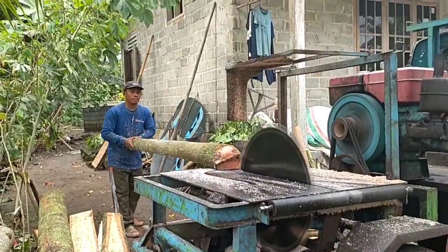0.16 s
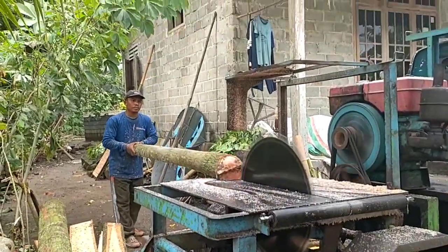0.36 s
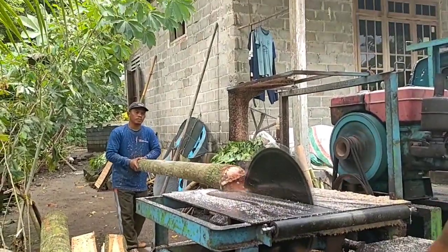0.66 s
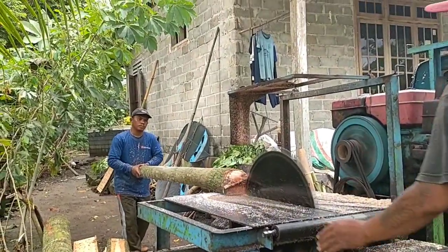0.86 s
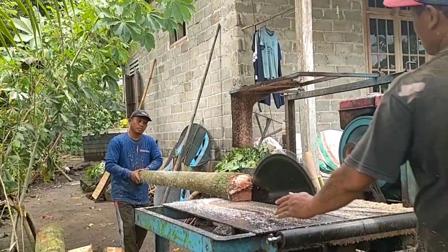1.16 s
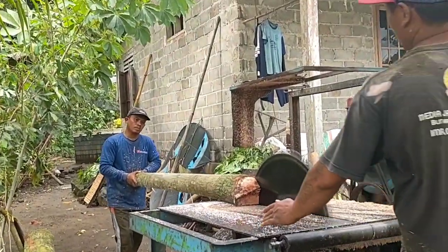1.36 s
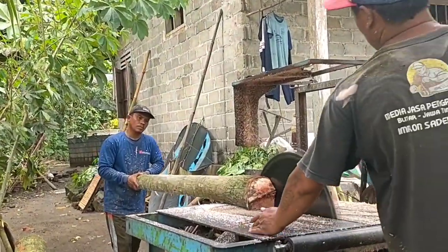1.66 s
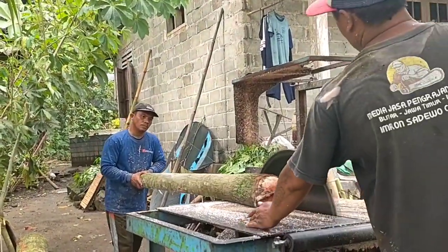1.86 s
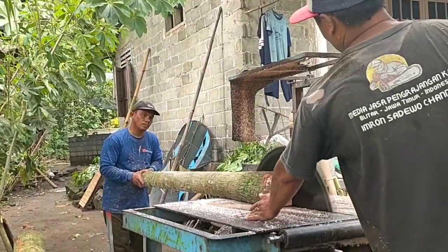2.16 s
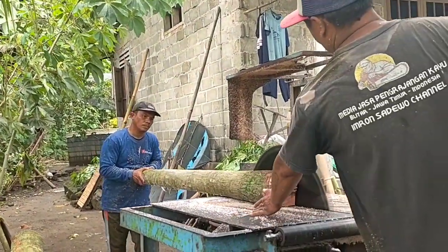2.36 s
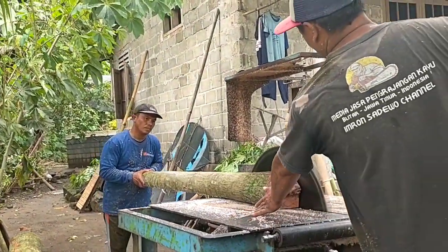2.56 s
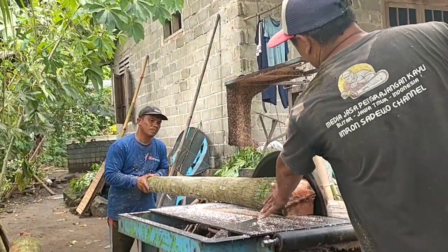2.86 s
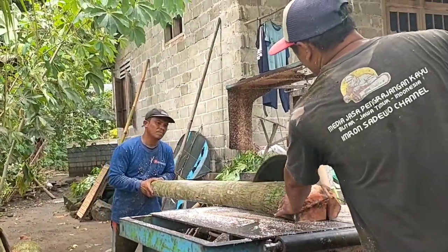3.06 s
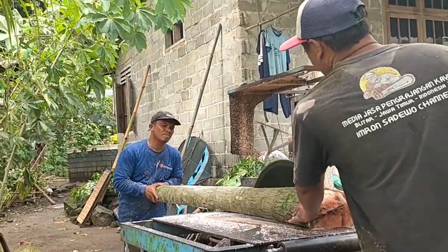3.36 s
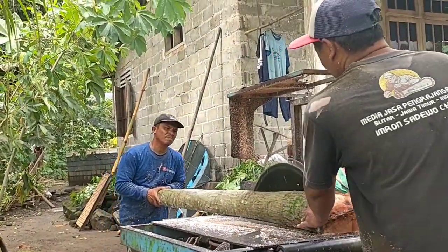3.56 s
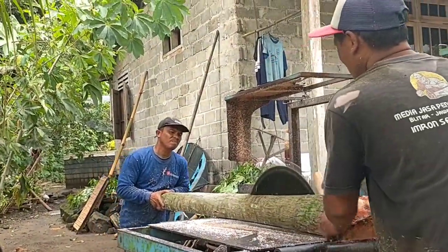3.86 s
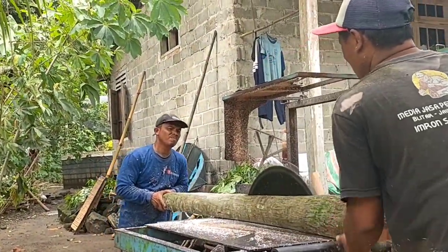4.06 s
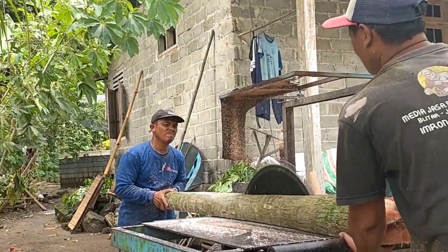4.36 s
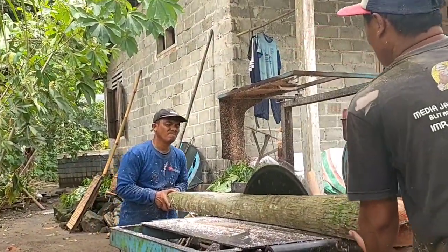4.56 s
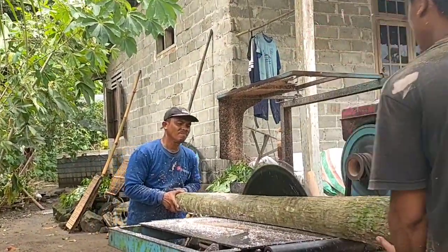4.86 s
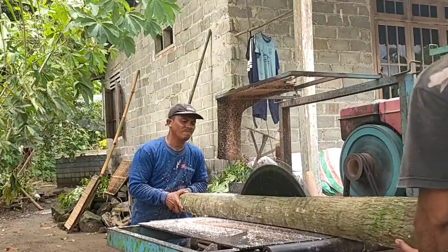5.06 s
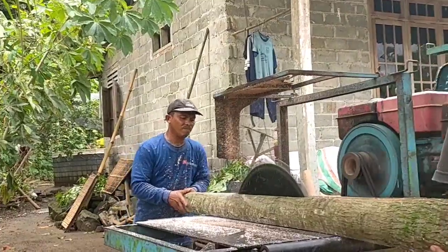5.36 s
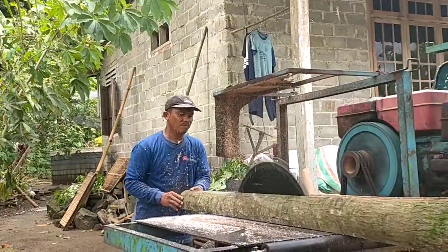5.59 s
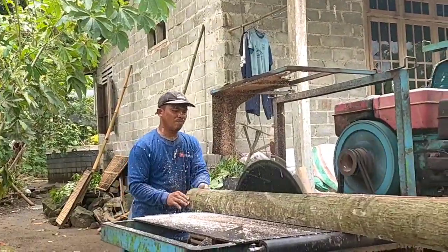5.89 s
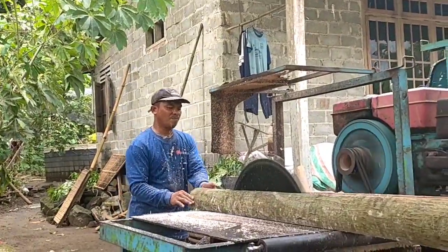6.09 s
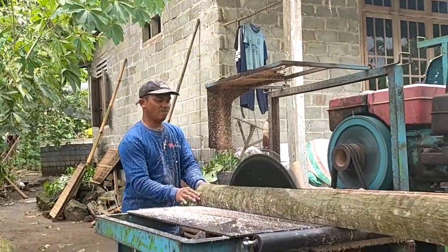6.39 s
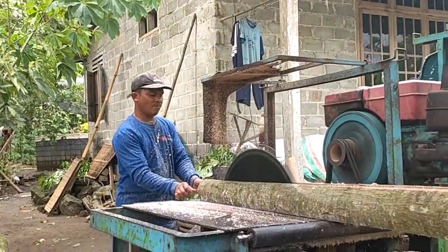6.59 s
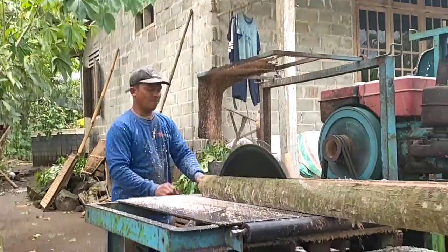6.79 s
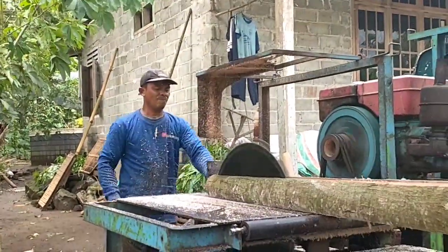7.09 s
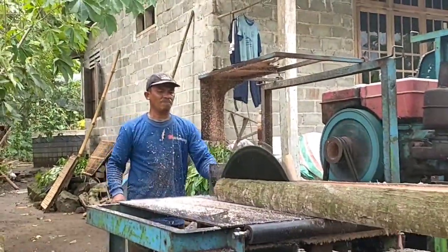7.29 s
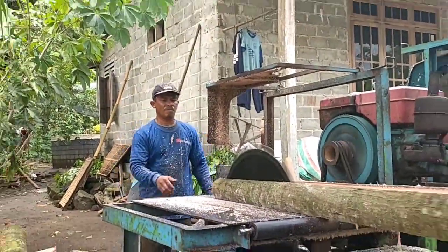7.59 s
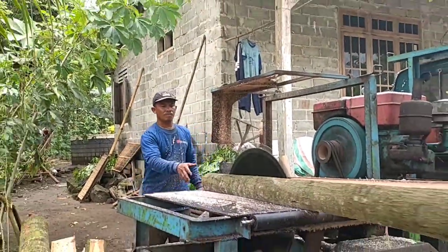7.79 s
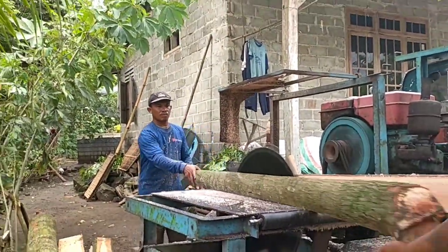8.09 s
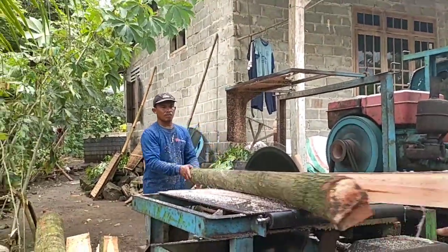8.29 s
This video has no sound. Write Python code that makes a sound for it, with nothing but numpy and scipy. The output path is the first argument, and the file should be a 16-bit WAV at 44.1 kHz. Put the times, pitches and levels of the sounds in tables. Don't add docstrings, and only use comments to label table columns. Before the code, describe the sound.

Outdoors in a yard, close handheld stereo: a single-cylinder diesel thumps about twelve times a second, with knocking valves and a rattling metal table. It first skips strokes lightly, then from about one second pulls hard with rough gas blasts while a circular saw hisses and sizzles through a log. Near seven seconds the cut ends, the blade sings thinly, and the engine becomes uneven again.

```python
import sys
import numpy as np
from scipy import signal
from scipy.fft import rfft, irfft, next_fast_len
from scipy.io import wavfile
from scipy.ndimage import uniform_filter1d, minimum_filter1d, map_coordinates

SR = 44100
rng = np.random.default_rng(int(sys.argv[2]) if len(sys.argv) > 2 else 0)


def to_linear_factor(level_db):
    exponent = np.asarray(level_db, float) / 20
    return 10 ** exponent


def pcm_store(signal):
    levels = np.round(np.clip(np.atleast_2d(signal), -1, 1) * 32767)
    wavfile.write(sys.argv[1], SR, levels.astype(np.int16).T)


N = 372204

# [f/Hz, left-right likeness/1]
LIKENESS = [(25, .985), (60, .995), (200, .985), (400, .95), (700, .88), (1280, .4), (2400, .38),
            (4400, .4), (15000, .3)]
# [delay/s, level/dB]
ECHOES = [(.011, -27.5), (.024, -49), (.041, -55)]

# [t/s, knock level/dB, table rattle level/dB]
GEAR_LEVELS = [(0, -28.5, -30.5), (.37, -26, -32), (.6, -32.5, -33.5), (.9, -32, -34), (1.7, -43, -40.5),
               (2.35, -37, -38.5), (2.72, -32.5, -36), (2.9, -37, -37.5), (3.57, -35.5, -37.5),
               (4.07, -38, -39.5), (4.56, -35.5, -37), (5.57, -38, -37), (6.4, -39, -38.5),
               (6.77, -39.5, -36), (7.38, -36, -30.5), (8.2, -32.5, -32.5), (8.44, -30.5, -29)]
# [f/Hz, density/dB per Hz]
CLATTER_SPECTRUM = [(200, -15), (330, -11), (480, -2.5), (700, -0.5), (850, 3), (1200, -3), (1550, -6.5),
                    (1900, -5), (3000, -13.5), (5000, -7)]
# [f/Hz, density/dB per Hz]
RUMBLE_SPECTRUM = [(15, -23), (30, 8), (60, 6), (110, 7), (200, -3), (300, -7), (450, -7)]
RUMBLE_DB, RUMBLE_FOLLOWS = -36, 0.56
DRAG_S, DRAG_LENGTH_S, DRAG_DB = 7.65, 0.97, 3

SIXTH_FIRING_S = [.0261, .5236, 1.0232, 1.5395, 2.071, 2.587, 3.1014, 3.614, 4.1266, 4.6296, 5.1415, 5.649,
                  6.1565, 6.6646, 7.1673, 7.6564, 8.1482, 8.638]
# [t/s, thump level/dB, gas blast level/dB]
CHARGE_LEVELS = [
    (0, -3, -24),
    (.86, -3, -26),
    (1.2, -6, -26),
    (1.701, -1, -16.5),
    (3.3, -1, -14.5),
    (5.5, -1.5, -17),
    (5.902, -4.5, -17),
    (6.902, -4, -17),
    (7.298, -2, -19),
    (8.44, -4, -24),
]
CHARGE_SPREAD_DB = 1
# [t/s, thump loss/dB, blast loss/dB]
LIGHT_LOAD_STROKES = [(.026, 5, 11), (.108, 35, 4), (.191, 8, 2), (.36, 21, 18), (.439, 21, 20),
                      (.524, -0.5, -3), (.607, -1.5, 20), (.857, -1, 1), (.688, 19, -6), (.774, 3, 15),
                      (.94, 4, 15), (1.023, -1, -3), (1.107, -1.5, 19), (7.411, -2, 14), (7.492, 6, 0),
                      (7.572, 2, 20), (7.737, 15, 16), (7.822, 10, -3), (7.984, 0, 1), (8.064, 2, 40),
                      (8.23, 3, 8), (8.312, 11, 17)]
# [t/s, blast loss/dB]
LEAN_STROKES = [(1.45, 13), (1.627, 14), (2.502, 1.5), (2.587, 10), (2.671, 4.5), (3.015, 16), (3.274, 12),
                (3.531, 11), (3.7, 6.5), (3.872, 5), (4.127, 3), (4.378, 9), (4.462, 8), (4.63, 16),
                (4.801, 4), (5.057, 6.5), (5.732, 4), (5.649, 11), (5.818, 1), (5.988, 5), (6.325, 20),
                (6.407, 4), (7.0, 9), (4.714, 0), (5.481, -2.5), (6.24, -2.5), (6.747, -5)]
LEAN_THUMP_SHARE = 0.36
# [f/Hz, level/dB, t60/s]
PIPE_MODES = [(64.4, -16.5, 0.13), (111, -68.5, 0.035), (165, -35, 0.1)]
# [f/Hz, density/dB per Hz]
BLAST_SPECTRUM = [(300, -9), (700, -4), (1150, -3), (1500, 1.5), (2200, 1), (3500, 0.5), (5200, -0.5),
                  (6800, -14), (8000, -22.5), (12000, -37.5), (15000, -43)]
# [f/Hz, level/dB, t60/s]
CASING_MODES = [(1480, -3.5, 0.049), (2216, -6, 0.046), (3310, -11, 0.021), (4860, -3.5, 0.015)]
# [delay/s, push (+) or pull (-)/1, width/s]
GEAR_KNOCKS = [
    (.0210, 1.0, 0.0034),
    (.0250, 1, 0.0045),
    (.0300, -0.55, 0.0031),
    (.0460, -0.69, 0.0041),
    (.0520, 0.3, 0.0042),
    (.0570, -0.41, 0.0071),
    (.0660, -0.51, 0.0093),
]
# [f/Hz, level/dB, t60/s]
TAPPET_MODES = [(840, -34, 0.2), (1574, -28, 0.033)]

# [t/s, level/dB]
SONG_LEVELS = [
    (0, -40),
    (2.2, -38),
    (3.2, -42),
    (6.7, -42),
    (6.95, -33),
    (7.1, -27),
    (7.5, -27),
    (7.7, -33),
    (8.44, -33),
]
# [f/Hz, density/dB per Hz]
SONG_SPECTRUM = [(3480, -30), (3590, 10), (3640, 13), (3690, -3), (3800, -19)]
# [f/Hz, density/dB per Hz]
PINCH_SPECTRUM = [(2560, -30), (2640, -3), (2690, 3), (2740, -3), (2820, -30)]
PINCH_S, PINCH_LENGTH_S, PINCH_DB = 2.74, 0.33, -34
# [t/s, level/dB, length/s]
RASP_EVENTS = [(2.725, -29, 0.19), (3.798, -31, 0.16), (0.492, -32, .05), (5.758, -30.5, .1),
               (6.012, -34, 0.14), (6.463, -28, 0.075), (6.828, -20, 0.019), (7.544, -25, 0.019),
               (7.672, -26.5, 0.051), (7.725, -33, 0.14), (7.987, -24.5, 0.027), (8.228, -30, 0.062)]
# [t/s, feed pressure level/dB, brightness/dB]
CUT_LEVELS = [(0, -33, -1.5), (.5, -29, 0.5), (.9, -30, 3.5), (1.1, -29, 4), (1.4, -31, 6.5),
              (1.72, -32.5, 2.5), (2.3, -31.5, 1), (2.75, -29.5, 0.5), (3.3, -32.5, 2), (3.75, -29, 1.5),
              (4.2, -32.5, 0.5), (4.6, -29.5, 1.5), (5.2, -31, 2.5), (5.8, -30, 0), (7.09, -30, -1),
              (7.11, -37, 1), (7.2, -32, -2.5), (8.44, -34.5, 0.5)]
# [f/Hz, width/Hz, gain/dB]
BLADE_MODES = [(846, 13, 3), (1480, 320, 4.5), (2640, 74, 2.5), (3996, 600, 1), (4410, 120, 3.5),
               (5060, 19, 3), (6270, 36, 0)]
# [f/Hz, density/dB per Hz]
BITE_SPECTRUM = [(700, -40), (1300, -8), (1900, -3), (2500, 0), (2850, 2), (3200, -0.5), (3600, -2)]
# [f/Hz, density/dB per Hz]
WHINE_SPECTRUM = [(2800, -30), (3200, -7.5), (3700, -4), (4200, -4), (4600, -7), (5200, -20.5)]
# [f/Hz, density/dB per Hz]
SIZZLE_SPECTRUM = [(4000, -49), (4600, -2.5), (5300, -2), (5900, -5.5), (6900, -12.5), (7700, -20.5),
                   (8300, -46)]
# [f/Hz, density/dB per Hz]
SPRAY_SPECTRUM = [(4590, -18), (7800, 1), (8110, 0.5), (8900, -4), (10400, -1.5), (13100, -4), (14200, -5),
                  (15300, -12)]
# (offset/dB, share of brightness/1)
BITE_LAW, WHINE_LAW = (-1.5, -0.34), (0.39, -0.1018)
SIZZLE_LAW, SPRAY_LAW = (-1.6, 0.96), (-17, 0.62)
FLARE_DB, FLARE_S = 3, 0.036

# [t/s, left minus right level/dB]
MIC_TURN = [
    (0, -4),
    (.73, -2.5),
    (2.2, -1.5),
    (5.3, -1),
    (7.26, -1.3),
    (7.5, -.4),
    (8.16, -0.2),
    (8.44, 0.5),
]
HOLD_DB, SQUEEZE, RECOVERY_DB_PER_S, GRIP_S, MAKEUP_DB = -24, 0.39, 35, 0.027, 1.5
# [f/Hz, strength/1]
THINNING_STRENGTH = [(200, 0.0), (600, .35), (2000, .5), (4500, .6), (5500, 1.0), (7000, 1.4), (9000, 1.8),
                     (15000, 1.8)]
# [f/Hz, level/dB]
SHUT_LEVELS = [(300, -14), (1000, -6), (3000, -3.2), (4800, -2.5), (5500, -1.6), (6500, -1.4), (8300, -.7),
               (10000, -.9), (12000, -.5), (15000, -.5)]


def in_time(rows):
    s, *columns = np.transpose(rows)
    return [np.interp(np.arange(N) / SR, s, c) for c in columns]


def at_hz(points, hz):
    f, value = np.array(points).T
    return np.interp(np.log(hz), np.log(f), value)


def drift(rate):
    r = np.exp(-80 * np.pi * rate / SR)
    noise = rng.standard_normal(N // 40 + 2002)
    slow = signal.lfilter([1], [1, -2 * r, r * r], noise)[2000:]
    return np.interp(np.arange(N) / 40, np.arange(len(slow)), slow / slow.std())


def clicks(times_s, sizes):
    out = np.full(N, 1e-18)
    at = np.round(np.asarray(times_s) * SR).astype(int)
    inside = (at >= 0) & (at < N)
    out[at[inside]] += np.asarray(sizes)[inside]
    return out


def puff(train, width_s):
    hump = np.hanning(max(int(2 * width_s * SR), 3))
    return signal.oaconvolve(train, hump, "same")


def ring(train, hz, t60_s):
    r, w = to_linear_factor(-60 / (t60_s * SR)), 2 * np.pi * hz / SR
    return signal.lfilter([0, np.sin(w)], [1, -2 * r * np.cos(w), r * r], train)


def hiss(spectrum, patchy_db, modes=(), count=8):
    size = next_fast_len(N)
    hz = np.maximum(np.arange(size // 2 + 1) * SR / size, 1)
    low, high = spectrum[0][0], spectrum[-1][0]
    modes_db = sum(db / (1 + (2 * (hz - f) / w) ** 2) for f, w, db in modes)
    colour = to_linear_factor(at_hz(spectrum, hz) + modes_db) * (hz >= low) * (hz <= high)
    alike = np.clip(at_hz(LIKENESS, hz), 0, 1)
    mid, side = rfft(rng.standard_normal((2, size))) * colour
    both = np.sqrt(1 + alike) * mid + np.sqrt(1 - alike) * side * [[1], [-1]]
    place = np.log(hz / low) / np.log(high / low) * (count - 1)
    together, out = drift(1.54), 0
    for k in range(count):
        band = irfft(both * np.clip(1 - abs(place - k), 0, 1), size)[:, :N]
        out = out + band * to_linear_factor(patchy_db * (0.51 * together + drift(13.0)))
    return out / np.sqrt(np.mean(out ** 2))


def yard(x):
    dull = signal.lfilter([.3], [1, -.7], x)
    out = np.array([x, x])
    for k, (delay_s, db) in enumerate(ECHOES):
        for side in range(2):
            lag = int(delay_s * SR) + 30 * ((side + k) % 2)
            out[side, lag:] += to_linear_factor(db) * dull[:-lag]
    return out


def table_and_rollers(clatter_db):
    drag_db = DRAG_DB * puff(clicks([DRAG_S], [1]), DRAG_LENGTH_S)
    rumble_db = RUMBLE_DB + RUMBLE_FOLLOWS * (clatter_db - clatter_db.mean()) + drag_db
    clatter = to_linear_factor(clatter_db + 4.5) * hiss(CLATTER_SPECTRUM, patchy_db=1.5, modes=BLADE_MODES[:2])
    return clatter + to_linear_factor(rumble_db) * hiss(RUMBLE_SPECTRUM, patchy_db=1.0, count=4)


def firing_times():
    listed = np.array(SIXTH_FIRING_S)
    even = np.linspace(listed[0], listed[-1], len(listed))
    steps = np.arange(6 * len(listed) - 5) / 6
    sway = map_coordinates(listed - even, [steps], order=3, mode="mirror")
    return np.interp(steps, np.arange(len(even)), even) + sway


def firings():
    s = firing_times()
    at, thump_db, blast_db = np.transpose(CHARGE_LEVELS)
    levels = np.array([np.interp(s, at, thump_db), np.interp(s, at, blast_db)])
    levels = levels + CHARGE_SPREAD_DB * rng.standard_normal((len(s), 2)).T
    lean = [(when, LEAN_THUMP_SHARE * loss, loss) for when, loss in LEAN_STROKES]
    for when, thump_loss, blast_loss in LIGHT_LOAD_STROKES + lean:
        levels[:, np.argmin(abs(s - when))] -= [thump_loss, blast_loss]
    return s, *levels


def running_gear(strokes, knock_db):
    s = strokes[0]
    luck = rng.standard_normal((len(s), 20))
    knocks, taps = 0, 0
    for k, (delay_s, push, width_s) in enumerate(GEAR_KNOCKS):
        knocks = knocks + puff(clicks(s + delay_s, push * to_linear_factor(1.9 * luck[:, k])), width_s / 2)
    knocks = knocks - uniform_filter1d(knocks, size=150)
    for k, (hz, db, t60_s) in enumerate(TAPPET_MODES):
        hits = clicks(s - .019, to_linear_factor(1.65 * luck[:, -1 - k]))
        taps = taps + to_linear_factor(db + 31.5) * ring(hits, hz, t60_s)
    return to_linear_factor(knock_db + 16.0) * knocks + to_linear_factor(knock_db) * taps


def exhaust(strokes):
    s, thump_db, _ = strokes
    opening = clicks(s - .003, to_linear_factor(thump_db))
    swing = sum(-to_linear_factor(db) * ring(opening, hz, t60_s) for hz, db, t60_s in PIPE_MODES)
    return to_linear_factor(-15.5) * puff(opening, 0.0018) + uniform_filter1d(swing, size=60)


def gas_blast(strokes):
    s, _, blast_db = strokes
    t = np.arange(int(.08 * SR)) / SR
    shape = (1 - np.exp(-t / 0.0035)) * (np.exp(-t / 0.01) + 0.38 * np.exp(-t / 0.015))
    jet = signal.oaconvolve(clicks(s - .003, to_linear_factor(blast_db + 1.5)), shape)[:N]
    luck = rng.standard_normal((len(s), 2, len(CASING_MODES)))
    crack = np.zeros((2, N))
    for side in range(2):
        for k, (hz, db, t60_s) in enumerate(CASING_MODES):
            hits = clicks(s + .001 * k, to_linear_factor(blast_db + db - 4.0) * luck[:, side, k])
            crack[side] += ring(hits, hz, t60_s)
    return jet * hiss(BLAST_SPECTRUM, patchy_db=1.8, count=6) + crack


def blade_song(song_db):
    return to_linear_factor(song_db) * hiss(SONG_SPECTRUM, patchy_db=0.0, count=2)


def pinch():
    grip = puff(clicks([PINCH_S], [to_linear_factor(PINCH_DB)]), PINCH_LENGTH_S)
    return grip * hiss(PINCH_SPECTRUM, patchy_db=3.0, count=2)


def rasps():
    touch = sum(puff(clicks([s], [to_linear_factor(db)]), length_s) for s, db, length_s in RASP_EVENTS)
    return touch * hiss(WHINE_SPECTRUM, patchy_db=3.5, count=2)


def saw(strokes, feed_db, bright_db):
    s, _, blast_db = strokes
    cycle = np.interp(np.arange(N) / SR, s, np.arange(len(s)))
    surge = to_linear_factor(0.65 * np.cos(2 * np.pi * (cycle - .12)))
    flare = to_linear_factor(FLARE_DB * puff(clicks(s + 0.024, to_linear_factor(blast_db + 10.5)), FLARE_S))
    chips = to_linear_factor(1.0 * np.minimum(rng.exponential(1, N // 16 + 1), 5)).repeat(16)[:N]
    chips = chips / np.sqrt(np.mean(chips ** 2))

    def level(law):
        return to_linear_factor(feed_db + law[0] + law[1] * bright_db)

    blade = level(BITE_LAW) * hiss(BITE_SPECTRUM, patchy_db=0.74, modes=BLADE_MODES, count=4)
    blade += level(WHINE_LAW) * hiss(WHINE_SPECTRUM, patchy_db=0.74, modes=BLADE_MODES, count=4)
    blade += level(SIZZLE_LAW) * hiss(SIZZLE_SPECTRUM, patchy_db=0.74, modes=BLADE_MODES, count=4)
    spray = level(SPRAY_LAW) * hiss(SPRAY_SPECTRUM, patchy_db=-0.05, count=4)
    return surge * (blade * flare ** 0.16 + flare * spray * chips)


def handheld(x):
    lag = -3.0 + 4.0 * drift(1.5)
    return np.array([x[0], map_coordinates(x[1], [np.arange(N) + lag], order=3, mode="nearest")])


def gain_control(x):
    creep_db = RECOVERY_DB_PER_S * np.arange(N) / SR
    level_db = 10 * np.log10(uniform_filter1d(np.mean(x ** 2, axis=0), size=400) + 1e-12)
    excess_db = np.maximum(level_db - HOLD_DB, 0) * SQUEEZE
    held_db = np.maximum.accumulate(excess_db + creep_db) - creep_db
    r = np.exp(-1 / (GRIP_S * SR))
    return x * to_linear_factor(MAKEUP_DB - signal.lfilter([1 - r], [1, -r], held_db))


def thin_weak_cells(x):
    hz, _, cells = signal.stft(x, SR, nperseg=2048, noverlap=1024)
    hz = np.maximum(hz, 1)
    power = np.sum(np.abs(cells) ** 2, axis=0) + 1e-20
    near = uniform_filter1d(power, size=3, axis=0)
    contrast = near / uniform_filter1d(near, size=41, axis=0)
    gain = np.minimum(contrast, 1.6) ** (0.79 * at_hz(THINNING_STRENGTH, hz)[:, None])
    patch = uniform_filter1d(uniform_filter1d(contrast, size=10, axis=0), size=2, axis=1)
    open_cells = patch > to_linear_factor(2 * at_hz(SHUT_LEVELS, hz))[:, None]
    open_cells = minimum_filter1d(minimum_filter1d(open_cells, size=5, axis=0), size=2, axis=1)
    return signal.istft(cells * gain * open_cells, SR, nperseg=2048, noverlap=1024)[1][:, :N]


def scene():
    strokes = firings()
    knock_db, clatter_db = in_time(GEAR_LEVELS)
    pan_db, = in_time(MIC_TURN)
    song_db, = in_time(SONG_LEVELS)
    steady = table_and_rollers(clatter_db)
    engine = yard(exhaust(strokes) + running_gear(strokes, knock_db)) * to_linear_factor([[.3], [-.3]])
    blade = saw(strokes, *in_time(CUT_LEVELS)) + rasps() + pinch() + blade_song(song_db - 9)
    wide = to_linear_factor(3.0) * (blade + to_linear_factor(-3.0) * gas_blast(strokes))
    return engine + steady + handheld(wide) * to_linear_factor(pan_db / 2 * [[1], [-1]])


def top_cut(x):
    return signal.sosfilt(signal.butter(12, 15410, fs=SR, output="sos"), x)


def record(dry):
    low_cut = signal.butter(1, 18, "high", fs=SR, output="sos")
    x = thin_weak_cells(gain_control(signal.sosfilt(low_cut, dry)))
    mix = 1.2 * np.tanh(x / 1.2)
    return top_cut(mix)


dry = scene()
out = record(dry)
pcm_store(out)
```